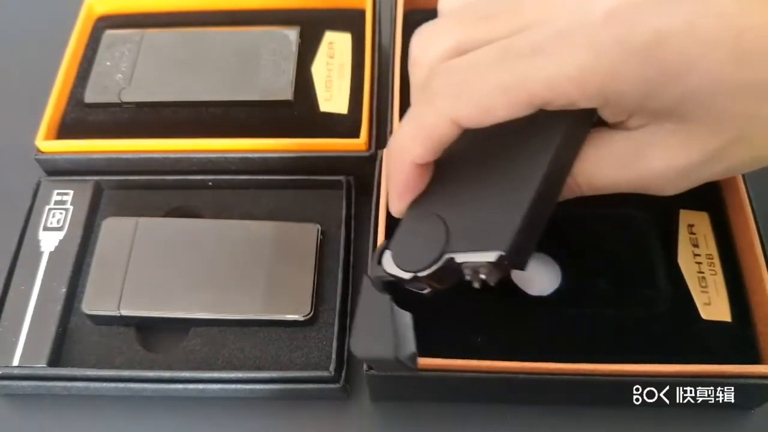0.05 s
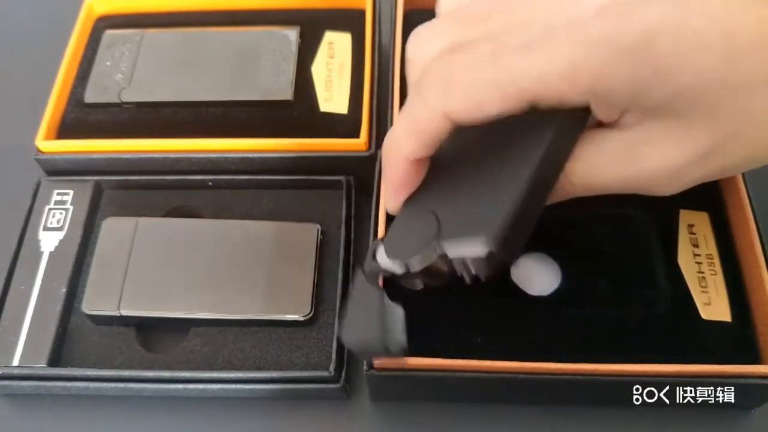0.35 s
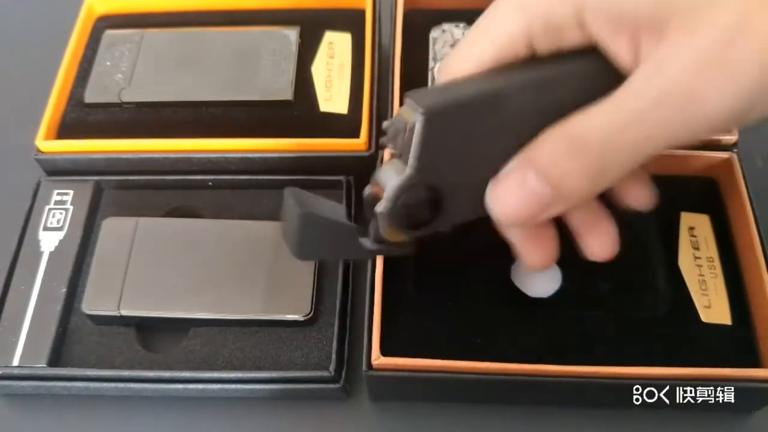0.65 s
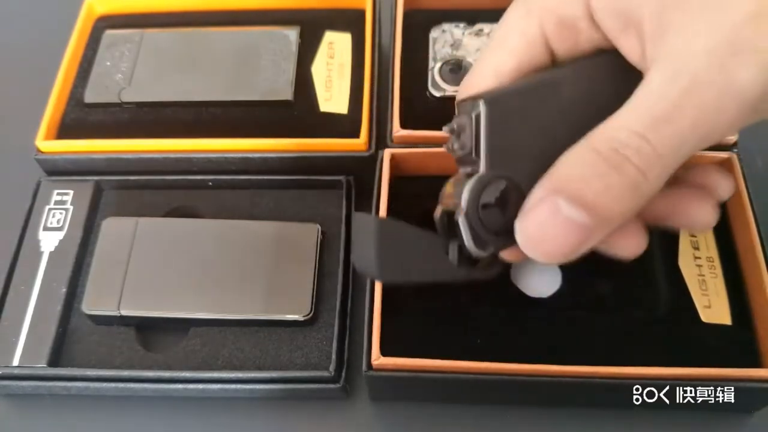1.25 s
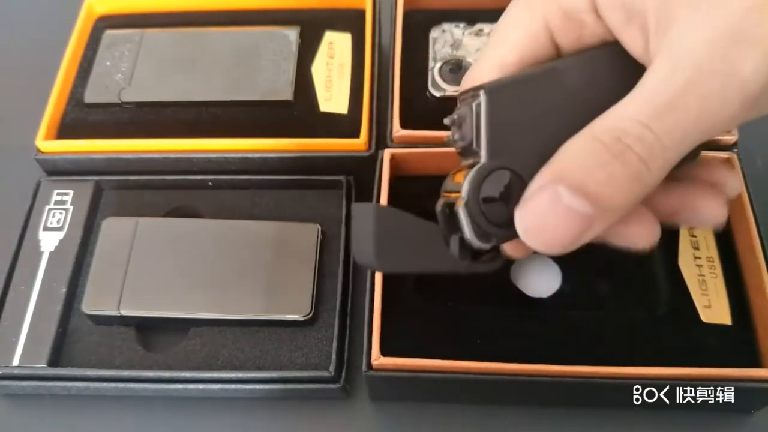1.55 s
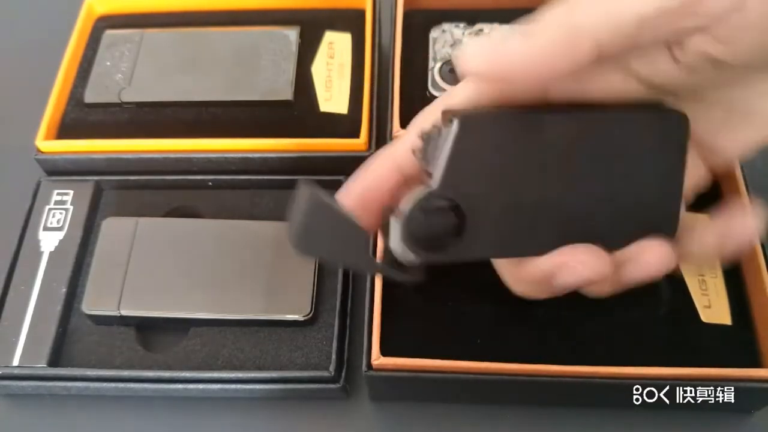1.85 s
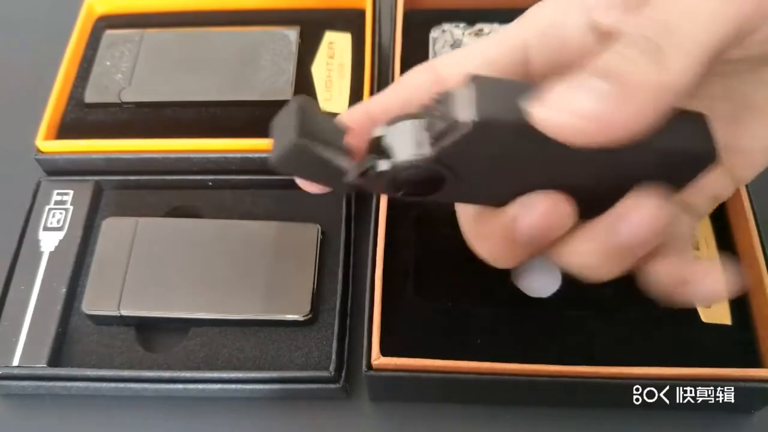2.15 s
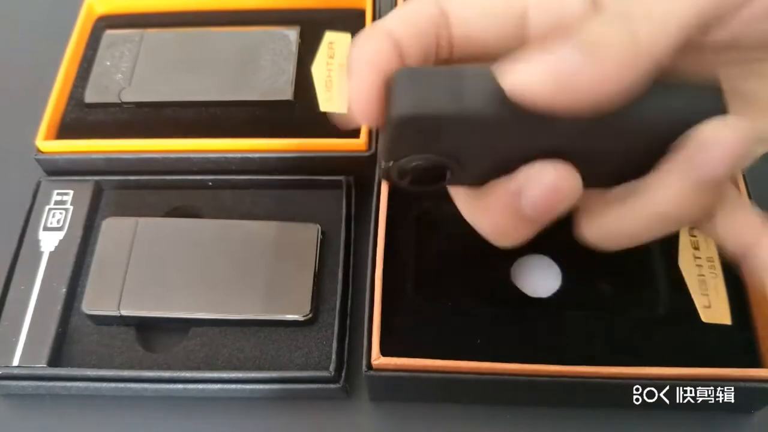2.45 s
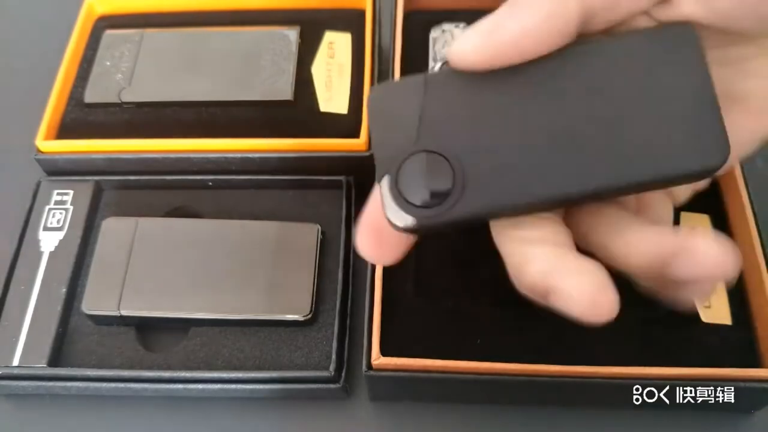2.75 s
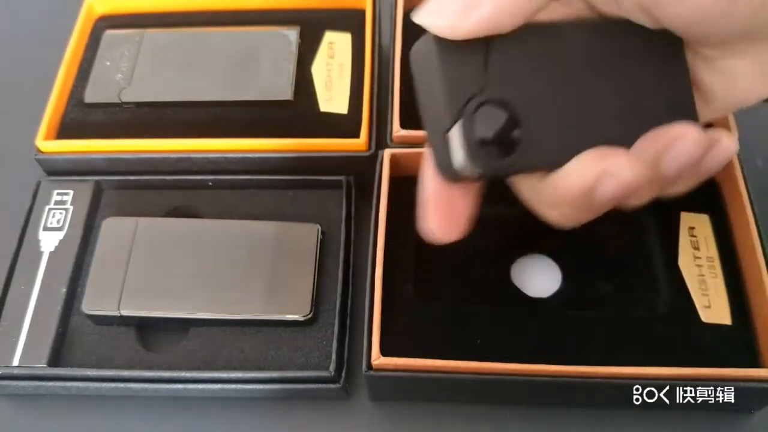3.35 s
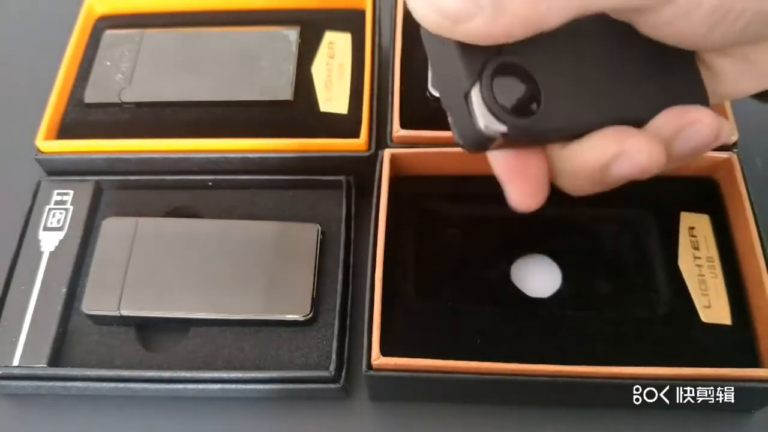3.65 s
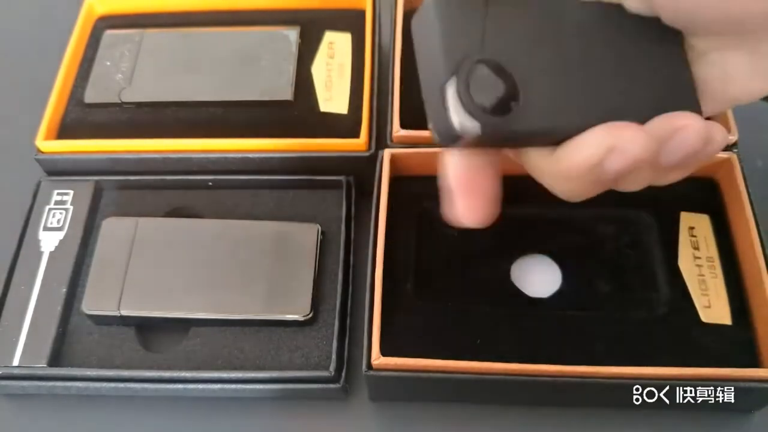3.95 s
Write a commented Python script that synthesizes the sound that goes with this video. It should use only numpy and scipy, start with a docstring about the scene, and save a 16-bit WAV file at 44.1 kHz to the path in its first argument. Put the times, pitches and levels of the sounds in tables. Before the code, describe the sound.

A metal lighter lid snaps shut close by at about 2.3 seconds, a sharp, bright click with a low thump, a short room echo and a brief faint low hum. Before it, fingers softly slide and squeak on the case, mostly around 0.5 seconds. Fainter rubbing follows, then one smaller click at about 3.8 seconds. A soft ventilation hum runs underneath, quieter after the snap.

```python
"""Metal lighter snapping shut

A lighter is turned in the hand above a table in a bare room with a faint ventilation hum.
The hinge spring ticks, the lid strikes the case with a low thump and the catch rattles brightly;
the room's tail and a brief low drone follow. Fingers slide and squeak on the case,
and near the end a loose part gives one smaller click."""
import sys
import numpy as np
from scipy import signal
from scipy.fft import rfft, irfft
from scipy.io import wavfile

SR = 44100
rng = np.random.default_rng(int(sys.argv[2]) if len(sys.argv) > 2 else 0)


def to_wav(sig):
    """Store sig (one row per channel, or 1-D mono) as 16-bit WAV at the path in sys.argv[1].

    Samples outside -1..1 are clipped; the rate is SR.
    """
    pcm = np.clip(np.atleast_2d(sig), -1, 1) * 32767
    pcm = np.round(pcm).astype(np.int16)
    wavfile.write(sys.argv[1], SR, pcm.T)  # frames by channels


N = 176400
T = np.arange(N) / SR
BINS_HZ = np.maximum(np.arange(N // 2 + 1) * SR / N, 1)

# lid blows (time [s], level [dB], contact cutoff [Hz], left-right [dB])
LID_BLOWS = [(2.3476, -3.5, 4484, 3), (2.3493, -10, 4030, 5), (2.3509, -21, 3994, 9.5),
             (2.3527, -25, 6974, 8.5)]
# case modes (frequency [Hz], gain [dB], t60 [s], left-right [dB])
CASE_MODES = [(740, -14, .006, -9), (990, -14, .005, -1.5), (2150, -7, 0.0058, -14.5), (2720, -8, .012, 4),
              (2908, -8, 0.014, 2), (3350, -7.5, 0.013, 7.5), (3925, -10, .009, 1), (4350, -3.5, 0.016, 5),
              (4990, -18.5, 0.0077, 5)]
def case(right_lag_s=.00013):
    """Each blow of the lid rings the hand-damped case; the sound reaches the right side later."""
    force = sum(from_db(db) * pan(side) * contact(s, hz) for s, db, hz, side in LID_BLOWS)
    left, right = ring_panned(force, CASE_MODES)
    return np.array([left, np.interp(T - right_lag_s, T, right)])


# noise bursts (time [s], level [dB], decay time [s], left-right [dB])
# those at 2.378 and 2.4 s are two faint, bright early echoes of the snap
GRIT_BURSTS = [(2.3502, -29.5, .003, 2), (2.3525, -14.5, 0.0025, 0), (2.356, -23, 0.00074, -0.5),
               (2.363, -35, .002, 4), (2.378, -36.5, .003, 8), (2.4, -40.5, .002, 11),
               (3.8276, -37, 0.0027, -6)]
# catch modes (frequency [Hz], gain [dB], t60 [s], left-right [dB])
CATCH_MODES = [(5370, -1, .012, 5.5), (5950, -9.5, .008, 3), (6940, -6, 0.0091, -5.5),
               (7650, -10, .004, -7), (8450, -8.5, .005, -11), (10100, -9, 0.00094, -2.5),
               (12800, -10, 0.0034, 10.5), (13900, -6, 0.0066, 0.5), (15250, -7, 0.0043, 2)]
def catch(top_hz=17996.5, dull_hz_per_db=201, grit_db=2.5):
    """The catch's rattle and two early echoes: bursts ring its high modes, softer ones duller."""
    loudest_db = max(row[1] for row in GRIT_BURSTS)
    force = 0
    for s, db, decay_s, side in GRIT_BURSTS:
        grit = rng.standard_normal((2, N)) * (T >= s) * cusp(s, decay_s)
        grit /= np.sqrt(np.sum(grit ** 2, axis=1, keepdims=True))
        cutoff_hz = top_hz + dull_hz_per_db * (db - loudest_db)
        force += from_db(db) * pan(side) * filtered(grit, cutoff_hz, "low")
    bare_grit = from_db(grit_db) * filtered(force, 5100, "high")
    return ring_panned(force, CATCH_MODES) + bare_grit


# hinge spring modes (frequency [Hz], gain [dB], t60 [s])
SPRING_MODES = [(1600, -15.5, .012), (2970, -1, 0.01208), (3700, -9, .008), (4350, -8, .009)]
def spring_tick(tick_s=2.3393, hiss_peak_s=2.342, rise_s=.0054, fall_s=.003):
    """A faint 3 kHz hiss swells into the tick of the spring tipping over before the lid lands."""
    envelope = cusp(hiss_peak_s, np.where(T < hiss_peak_s, rise_s, fall_s))
    hiss = from_db(-32) * rasp(3200, width_hz=900) * envelope
    force = from_db(-14.5) * contact(tick_s, cutoff_hz=3900)
    spring = sum(from_db(db) * ring(force, hz, t60) for hz, db, t60 in SPRING_MODES)
    return hiss + pan(-2) * filtered(spring, 1450, "high", order=5)


def thump(time_s=2.3482, width_s=.0018):
    """The snap gives one low push and pull, and a short knock rings on."""
    u = (T - time_s) / width_s
    pulse = -np.tanh(u * 7) * np.exp(-np.minimum(np.hypot(u, .3), 20))
    push = filtered(pulse, 180, "low", order=1)
    knock = -filtered(ring(click(time_s), hz=94, t60_s=.14), 400, "low")
    return pan(-10.5) * (from_db(-12.5) * push + from_db(-29.5) * knock)


# knocks on the stop (time [s], level [dB], left-right [dB])
PART_KNOCKS = [(3.8206, -39, -1), (3.8235, -18, 7), (3.8242, -30.5, -1)]
# loose part modes (frequency [Hz], gain [dB], t60 [s])
PART_MODES = [(2330, -7.5, 0.013), (2570, -10, 0.023), (2850, -7, 0.0065), (3700, -4, 0.015),
              (4520, -15.5, 0.019), (4900, -23, .01)]
def loose_part(cutoff_hz=3940):
    """A loose part knocks against its stop as the grip shifts."""
    force = sum(from_db(db) * pan(side) * contact(s, cutoff_hz) for s, db, side in PART_KNOCKS)
    ringing = sum(from_db(db) * ring(force, hz, t60) for hz, db, t60 in PART_MODES)
    return filtered(ringing, 2000, "high", order=3)


def drone(start_s=2.405, attack_s=.026, hold_s=.11, release_s=.24, hz=99.7):
    """A low, pure tone swells and fades after the snap."""
    corners_s = start_s + np.cumsum([0, attack_s, hold_s, release_s])
    envelope = np.interp(T, corners_s, [0, 1, 1, 0]) ** 2.3
    return from_db(-39.5) * pan(-11) * envelope * np.sin(2 * np.pi * hz * T)


# finger strokes (centre [s], half-width [s], level [dB], treble lift [dB])
FINGER_STROKES = [(0.017, .14, -69.5, 5), (0.47, 0.11, -73, -4), (0.534, .016, -64, -8),
                  (0.583, 0.05, -63.5, 0.5), (0.698, 0.12, -70, -0.5), (1.726, 0.1, -73.5, -4),
                  (1.822, 0.06, -75, 3.5), (2.02, .25, -73, -1.5), (2.88, 0.087, -83, 8),
                  (3.369, 0.064, -81.5, 7), (3.52, .1, -79, 7)]
# skin friction spectrum (frequency [Hz], relative density [dB])
SKIN_SPECTRUM = [(900, -14), (2000, 3), (4200, 3.5), (5500, -9), (8000, -13), (10000, -30.5), (15000, -32)]
def finger_slides(treble_hz=5200):
    """Skin hisses over the case, each stroke with its own brightness."""
    skin = coloured(SKIN_SPECTRUM, correlation=.22) * from_db(2 * drift(rate_hz=120))
    treble = irfft(rfft(skin) * (BINS_HZ > treble_hz), N)
    return sum(from_db(db) * swell(s, half_width_s) * (skin + (from_db(lift_db) - 1) * treble)
               for s, half_width_s, db, lift_db in FINGER_STROKES)


# squeaks (centre [s], half-width [s], level [dB], frequency [Hz], left-right [dB])
FINGER_SQUEAKS = [(0.537, 0.019, -53.5, 2150, 0), (.565, 0.032, -65, 3300, -1),
                  (0.586, 0.028, -54.5, 2230, 0), (.588, .018, -87, 14200, 0), (.59, .02, -88, 12100, -2),
                  (.685, 0.025, -62, 2660, -4), (0.719, 0.015, -63.5, 2620, -9),
                  (1.106, 0.052, -71, 2650, -9), (2.928, 0.053, -76, 3550, 10),
                  (3.024, 0.02, -69.5, 3700, 12), (3.03, .1, -72, 2690, 4), (3.067, 0.049, -75, 3440, 9),
                  (3.352, 0.034, -83, 14450, 0), (3.5, 0.17, -85.5, 4350, 10)]
def finger_squeaks():
    """Skin now and then sticks on the case in a rough squeak."""
    return sum(from_db(db) * pan(side) * swell(s, half_width_s) * rasp(hz, width_hz=320)
               for s, half_width_s, db, hz, side in FINGER_SQUEAKS)


# reverberation (frequency [Hz], gain [dB], t60 [s], left-right [dB])
ROOM_REVERB = [(900, -23, 0.7, -3.5), (1900, -19, .85, 4.5), (2800, -17, 0.72, 5), (3900, -17, .6, 6.5),
               (5500, -12, .44, 3.5), (8000, -12.5, 0.36, -3.5), (11000, -8.5, 0.24, 0),
               (14500, -12, .25, -1)]
def room(x, build_s=.011):
    """Each narrow band fills the room with a diffuse tail that dies faster in the treble."""
    edges_hz = 600 * 2 ** (np.arange(29) / 6)
    onset = np.argmax(abs(x[0]) > 1e-4)
    white = rng.standard_normal((2, 2, N))
    tail = np.zeros((2, N))
    build = np.exp(-1 / (build_s * SR))
    for k, band in enumerate(zip(edges_hz, edges_hz[1:])):
        hz = np.sqrt(band[0] * band[1])
        db, t60, side = (at_hz(ROOM_REVERB, hz, column) for column in (1, 2, 3))
        decay = np.exp(-2 * np.log(1000) / (t60 * SR))
        power = np.mean(filtered(x[:, onset:], band, "band") ** 2, axis=0) + 1e-18
        stored = signal.lfilter([(1 - decay) * (1 - build)], [1, -decay - build, decay * build], power)
        diffuse = rms_one(filtered(white[k % 2, :, onset:], band, "band"))
        tail[:, onset:] += from_db(db) * pan(side) * np.sqrt(stored) * diffuse
    return tail


# air spectrum before the snap (frequency [Hz], relative density [dB])
EARLY_AIR = [(15, -31), (25, -10), (50, -3.5), (100, -3.5), (150, -6.5), (240, -9.5), (330, -11),
             (420, -17.5), (650, -20.5), (1000, -18), (1300, -20), (1700, -27), (2700, -32), (4200, -42),
             (4900, -60.5), (8000, -65.5), (15000, -66.5)]
# air spectrum after the snap (frequency [Hz], relative density [dB])
LATE_AIR = [(15, -39.5), (25, -19), (60, 1.5), (100, -4.5), (160, -7), (250, -12), (330, -12.5),
            (480, -20.5), (1000, -17), (1450, -25.5), (2000, -28.5), (3000, -40.5), (4700, -55),
            (15000, -63.5)]
# stereo image of the air (frequency [Hz], left-right correlation [0..1])
AIR_CORRELATION = [(60, 0.96), (180, 0.9), (550, 0.41), (1650, 0.074), (4970, 0.06), (15000, 0.13)]
def room_air(after_snap):
    """A low rush of air, quieter and duller after the snap."""
    correlation = at_hz(AIR_CORRELATION, BINS_HZ)
    early = from_db(-50) * pan(-1.3) * coloured(EARLY_AIR, correlation)
    late = from_db(-56) * pan(6.5) * coloured(LATE_AIR, correlation)
    return (1 - after_snap) * early + after_snap * late


# ventilation tones (frequency [Hz], rms level before the snap [dB])
VENT_TONES = [(207, -65), (247, -61.5), (332, -66.5), (1021, -69)]
def ventilation(after_snap, drop_db=-5.5):
    """The ventilation hums in wavering tones, quieter after the snap."""
    hum = 0
    for hz, db in VENT_TONES:
        amplitude = from_db(db) * np.sqrt(2) * (1 + .25 * drift(rate_hz=9))
        hum += amplitude * np.sin(2 * np.pi * hz * T + .8 * drift(rate_hz=7))
    return hum * from_db(drop_db * after_snap)


def from_db(db):
    """Decibels to gain."""
    return 10 ** (np.asarray(db) / 20)


def rms_one(x):
    """Scale to unit rms."""
    return x / np.sqrt(np.mean(x ** 2) + 1e-20)


def pan(db):
    """Stereo gains for a left-minus-right level."""
    return from_db(np.array([[db], [-db]]) / 2)


def at_hz(table, hz, column=1):
    """Interpolate a column over log frequency."""
    table = np.array(table)
    return np.interp(np.log(hz), np.log(table[:, 0]), table[:, column])


def filtered(x, hz, kind, order=2):
    """Butterworth filter."""
    sos = signal.butter(order, np.clip(hz, 10, SR * .48), kind, fs=SR, output="sos")
    return signal.sosfilt(sos, x + 1e-18)


def click(time_s):
    """Unit impulse."""
    return 1. * (np.arange(N) == int(time_s * SR))


def contact(time_s, cutoff_hz):
    """Force of one blow: a low-passed impulse."""
    return filtered(click(time_s), cutoff_hz, "low", order=6)


def ring(x, hz, t60_s):
    """One mode: a unit impulse starts a decaying sine of height 1."""
    radius = np.exp(-np.log(1000) / (t60_s * SR))
    angle = 2 * np.pi * hz / SR
    return signal.lfilter([0, np.sin(angle)], [1, -2 * radius * np.cos(angle), radius ** 2], x + 1e-18)


def ring_panned(force, modes):
    """Sum of panned modes, alternating in sign."""
    return sum(from_db(db) * pan(side) * ring(force, hz, t60) * (-1) ** k
               for k, (hz, db, t60, side) in enumerate(modes))


def rasp(hz, width_hz):
    """Narrow-band noise; rms 1."""
    band = filtered(rng.standard_normal((2, N)), [hz - width_hz / 2, hz + width_hz / 2], "band")
    return rms_one(filtered(band, hz * 1.7, "low", order=4))


def coloured(spectrum, correlation):
    """Stereo noise of given spectrum and left-right correlation; rms 1."""
    mid, side = rfft(rng.standard_normal((2, N))) * from_db(at_hz(spectrum, BINS_HZ))
    stereo = np.sqrt(1 + correlation) * mid + np.sqrt(1 - correlation) * side * [[1], [-1]]
    return rms_one(irfft(stereo, N))


def drift(rate_hz):
    """Random wander between knots of spread 1."""
    knots = rng.standard_normal(512)
    return np.interp(T * rate_hz, np.arange(len(knots)), knots)


def swell(centre_s, half_width_s):
    """Bell-shaped envelope."""
    return np.exp(-2 * np.minimum(((T - centre_s) / half_width_s) ** 2, 20))


def cusp(peak_s, decay_s):
    """Exponential fall on both sides of a peak."""
    return np.exp(-np.minimum(abs(T - peak_s) / decay_s, 20))


def scene(snap_s=2.35, crossfade_s=.011, part_send_db=4):
    """The lighter close by, its echo and the quiet room."""
    lid = spring_tick() + case() + catch()
    part = loose_part()
    echo = room(lid + from_db(part_send_db) * part)
    fingers = finger_slides() + finger_squeaks()
    after_snap = np.clip((T - snap_s) / crossfade_s, 0, 1)
    background = room_air(after_snap) + ventilation(after_snap)
    return lid + thump() + part + drone() + fingers + echo + background


def record(dry, cutoff_hz=15700):
    """A steep low-pass cuts the top."""
    return signal.sosfilt(signal.ellip(10, .1, 80, cutoff_hz, fs=SR, output="sos"), dry)


dry = scene()
out = record(dry)
to_wav(out)
```